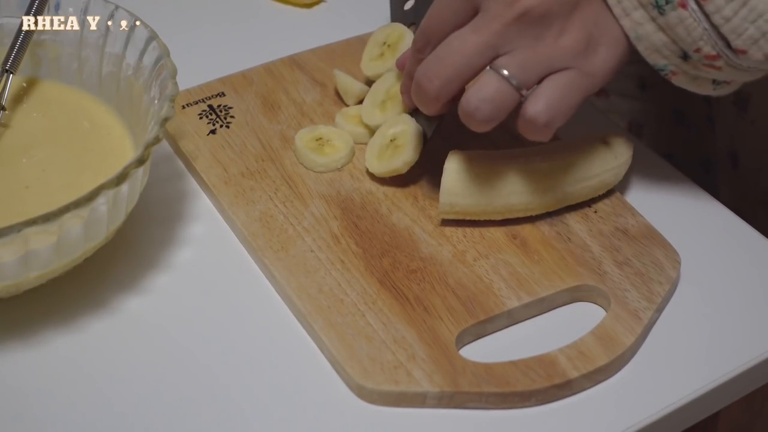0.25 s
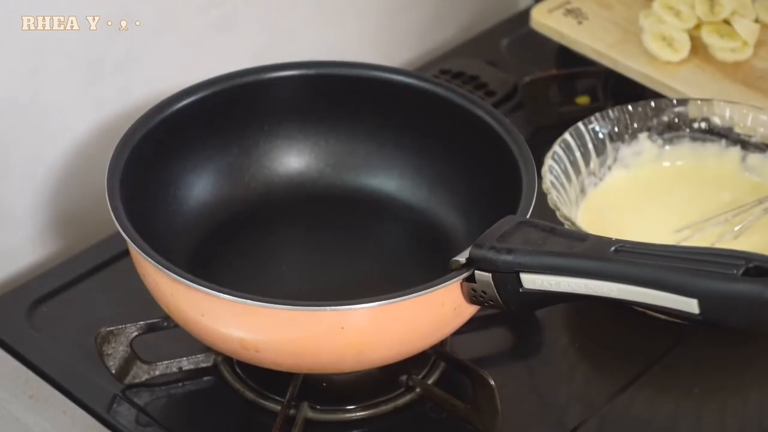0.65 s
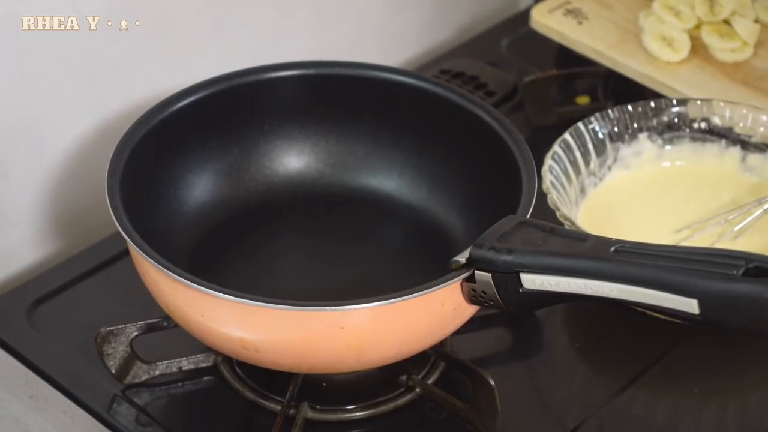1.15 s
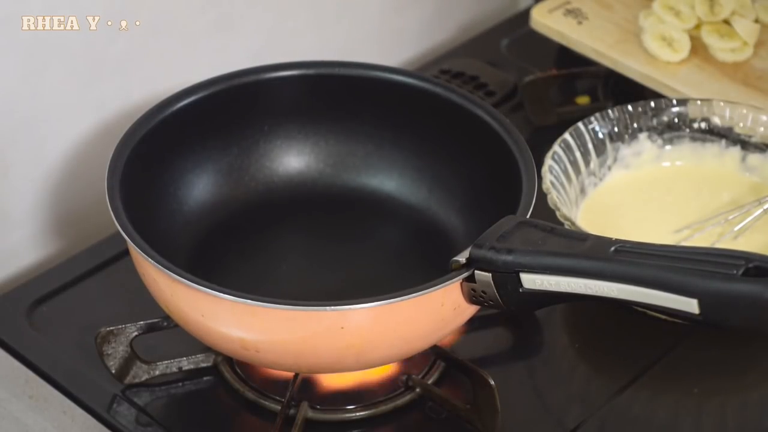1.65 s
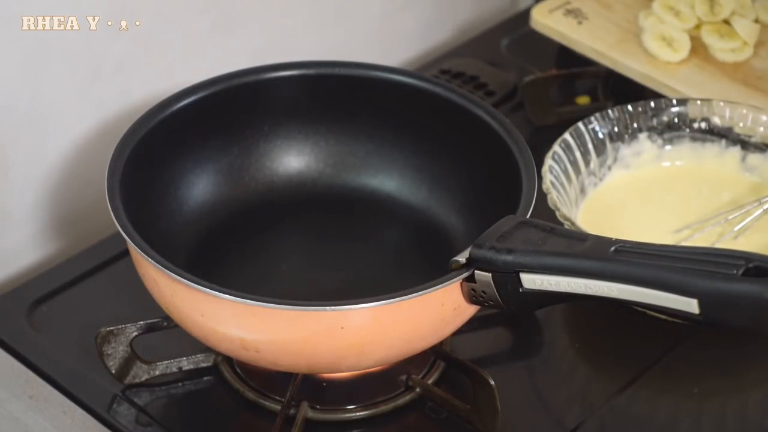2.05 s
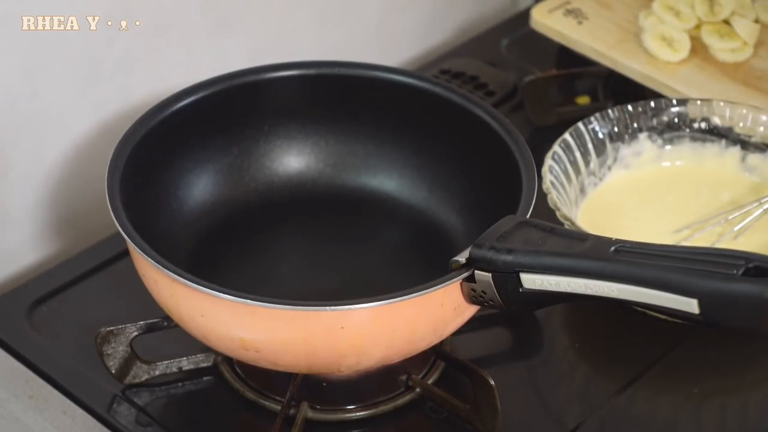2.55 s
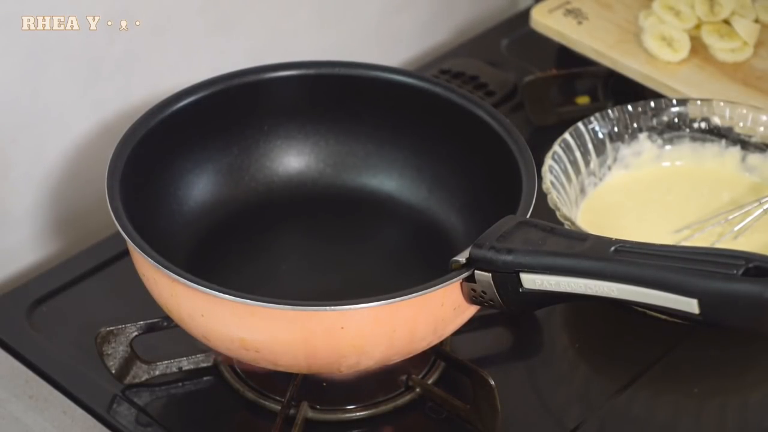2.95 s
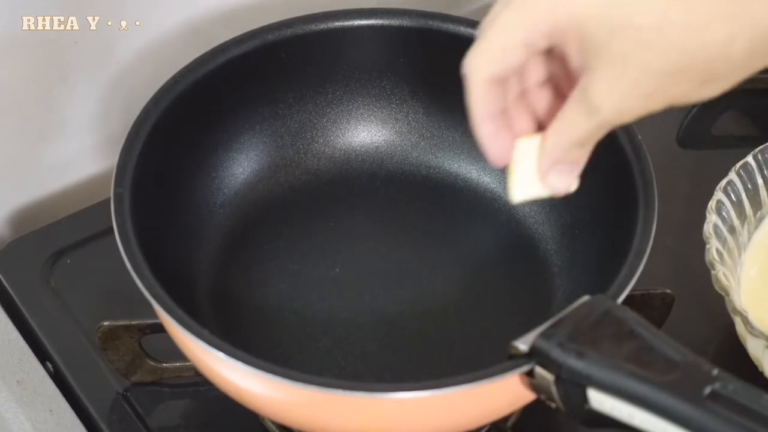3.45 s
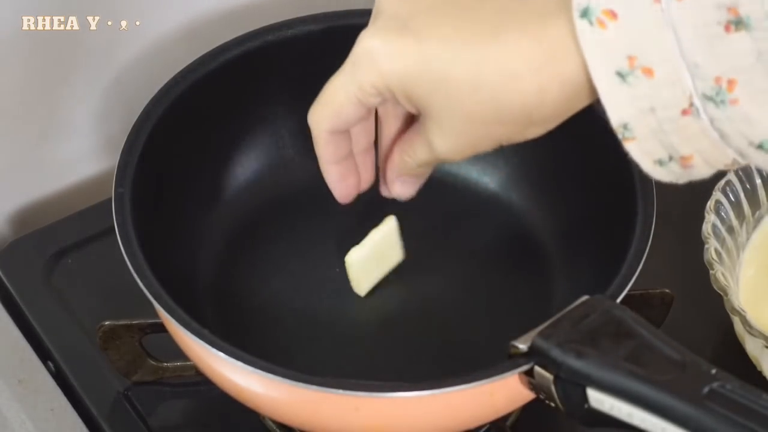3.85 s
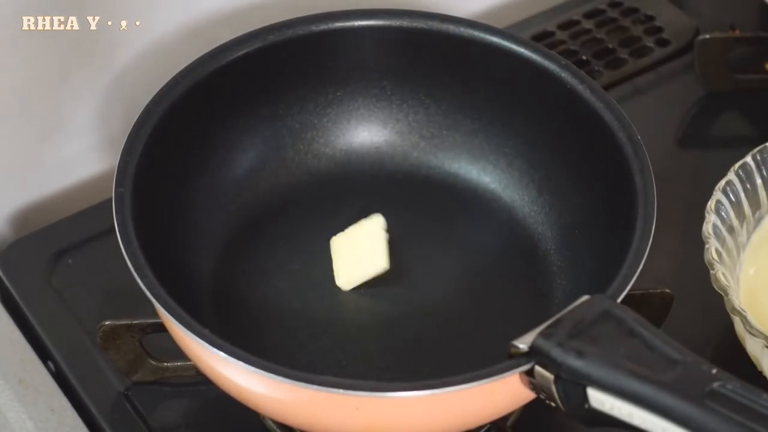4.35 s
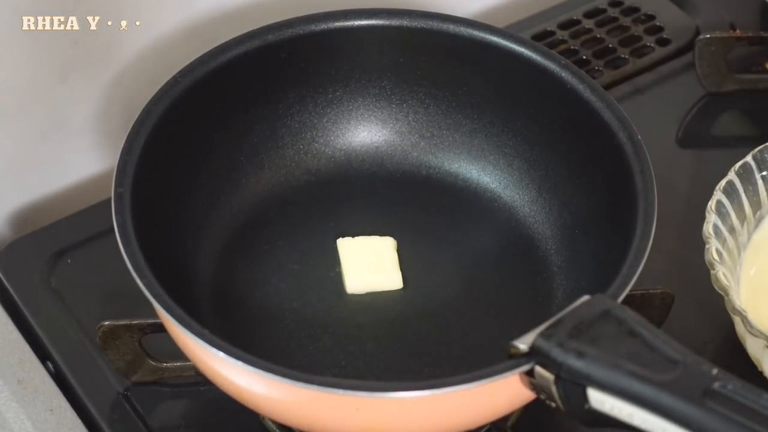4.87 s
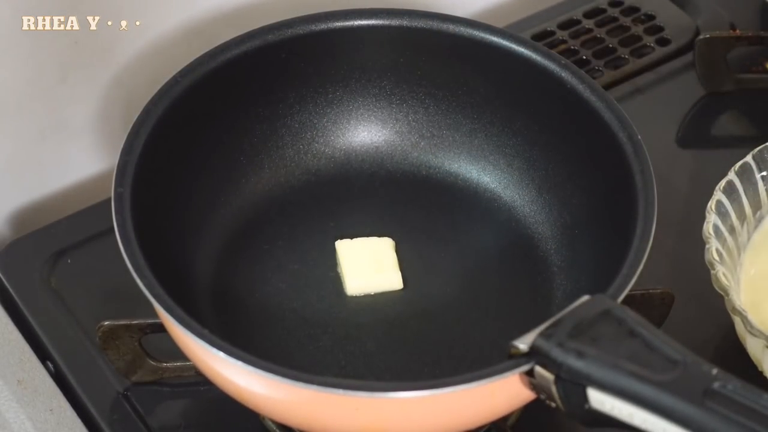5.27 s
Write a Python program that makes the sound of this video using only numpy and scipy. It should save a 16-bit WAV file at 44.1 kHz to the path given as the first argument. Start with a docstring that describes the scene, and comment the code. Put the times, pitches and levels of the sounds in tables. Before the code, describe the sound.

Knob clunks and quick igniter snaps light a gas burner with a soft puff, before butter taps and slaps into a frying pan.

```python
"""Lighting a gas hob and melting butter

In a small kitchen a knob knocks the hob casing into vibration and latches; the igniter's arc snaps
seven times a second, and the gas catches in puffs of combustion noise. A pat of cold butter is stood
in the pan and topples flat, exciting the pan's modes, then sizzles faintly as tiny bubbles burst.
Now and then there is a dry tick, a sleeve rustles and the microphone sways on its mount."""
import sys
import numpy as np
from scipy import signal
from scipy.fft import rfft, irfft
from scipy.io import wavfile

SR = 44100
rng = np.random.default_rng(int(sys.argv[2]) if len(sys.argv) > 2 else 0)


def store_pcm(level_fs):
    """Save levels as 16-bit WAV."""
    pcm = np.round(np.clip(level_fs, -1, 1) * 32767).astype(np.int16)
    wavfile.write(sys.argv[1], SR, np.atleast_2d(pcm).T)


N = 242991
TIME = np.arange(N) / SR
AGE = TIME[:SR]   # time axis of one transient

# Levels in the tables are relative. Reverberation time of the kitchen: f/Hz, t60/s
ROOM_T60 = [(150, 0.43), (700, 0.5), (2000, 0.33), (5500, 0.32), (9000, 0.27), (15000, 0.2)]
# room tone: f/Hz, level/dB
ROOM_TONE_SPECTRUM = [(24, -37), (40, -1.5), (147, -10), (237, -9.5), (262, -9), (363, -9), (433, -14),
                      (1340, -22.5), (1630, -17), (2260, -37), (2630, -24.5), (2840, -29.5), (16000, -39)]
# faint narrow hums: f/Hz, bandwidth/Hz, level/dB
HUMS = [(220, 27, -70.5), (1880, 250, -76.5), (2540, 120, -81.5), (4560, 90, -85)]
# dry ticks: t/s, level/dB, centre f/Hz
TICKS = [(.061, -55.5, 10000), (1.068, -49, 8700), (3.604, -52, 6730), (3.677, -52, 6400),
         (3.902, -51, 4940), (4.2833, -36.5, 6500), (4.693, -46.5, 9700), (4.784, -52, 7000),
         (4.991, -51.5, 5470), (5.149, -49.5, 5490), (5.4914, -49, 8930)]
# strokes of a sleeve: t/s, level/dB, rise/s, hold/s
SLEEVE_STROKES = [(.327, -55.5, 0.0056, .3), (.375, -50.5, 0.05, .02), (.51, -53, 0.04, .17),
                  (.69, -53.5, 0.035, .02), (3.16, -49, 0.0026, 0.024), (3.166, -42, .04, .29)]
# rubbing cloth: f/Hz, level/dB
SLEEVE_SPECTRUM = [(150, -16), (250, -15), (460, -8), (640, -2), (735, -6), (1760, 0.5), (2130, -2),
                   (3580, -5.5), (5730, -11), (12300, -22), (16000, -30)]
# nudges of the microphone mount: t/s, level/dB, f/Hz, rise/s, t60/s
SWAYS = [(0.331, -34.5, 9.3, .006, 3.2), (3.162, -27, 12.4, 0.0028, 2.7), (4.5, -38.5, 10.6, 0.058, 7.5)]
# rumble of the mount: f/Hz, level/dB
RUMBLE_SPECTRUM = [(20, -2), (42, -2), (75, -9), (130, -17), (400, -34.5), (2000, -67)]
# thumps through the hob: t/s, level/dB, swell/s
THUMPS = [(0.334, -49, .04), (3.165, -43, 0.03), (3.458, -45, 0.029), (3.6, -48.5, .04),
          (3.731, -46.5, .03), (4.036, -40.5, .045)]
# knocks of the knob on the casing: t/s, level/dB, swell/s, rattle/dB
KNOCKS = [(0.555, -32.5, 0.011, -15.5), (.664, -28, 0.01022, -11.5), (.85, -27, .006, -7.5),
          (1.024, -44.5, 0.012, -0.5), (1.377, -28.5, 0.0048, -14.5), (1.647, -30.5, 0.0082, -15),
          (2.02, -43.5, 0.00824, -8.5), (2.187, -47.5, 0.0085, -16), (2.337, -50.5, 0.0086, -25)]
# normal modes of the casing: f/Hz, level/dB, t60/s
CASING_MODES = [(213, -13, 0.14), (311, -7.5, 0.16), (359, -3, 0.031), (415, -15, 0.088), (525, -16, 0.093),
                (620, -7.5, 0.026), (700, -23, 0.017), (930, -17.5, 0.051)]
# loose parts of the casing: f/Hz, level/dB
RATTLE_SPECTRUM = [(200, 6), (600, 1), (1400, 5.5), (3200, -3), (6000, -14.5), (15000, -37)]
# impacts of the catch: t/s, level/dB, swell/s
LATCH_CLICKS = [(0.8329, -20, .001), (.837, -20, 0.0022), (0.923, -42.5, 0.0051)]
# click of the catch: f/Hz, level/dB
LATCH_SPECTRUM = [(300, -10.5), (1000, -3.5), (1800, -11.5), (2400, -3), (2900, -6), (3500, 0.5), (4400, 5),
                  (5200, 4.5), (6300, -6), (7800, -4.5), (10000, -15.5), (13000, -6), (16000, -22)]
# strength of the sparks, which weaken once the gas burns: t/s, level/dB
SPARK_LEVELS = [(1.12, -4), (1.37, -.2), (1.6, -5), (2.83, -9.5)]
# sound paths between hob and pan bottom: delay/s, level/dB
SPARK_PATHS = [(.0002, -14.5), (.0008, -14), (.00142, 0), (.00197, -5.5), (.0027, -24)]
# snap of a spark: f/Hz, level/dB
SPARK_SPECTRUM = [(300, -30), (900, -21.5), (1600, -4.5), (3000, -4), (4800, -18), (5700, -6.5), (7700, 1),
                  (9200, -5.5), (10900, -11.5), (11900, 3.5), (13200, 3), (15000, -5), (16000, -20)]
# resonances of burner and pan bottom: f/Hz, bandwidth/Hz, level/dB
SPARK_RESONANCES = [(1670, 260, -21), (2453, 150, -12.5), (4040, 280, -9), (5350, 39, -10),
                    (5830, 120, -8.5), (6760, 97, -9), (7740, 230, -9.5), (8220, 32, -10.5),
                    (9170, 55, -16), (10050, 30, -23), (11460, 49, -11), (12660, 330, -18.5)]
# a spark as the room returns it: f/Hz, level/dB
SPARK_ECHO_SPECTRUM = [(300, -29), (800, -10.5), (1400, -5.5), (2400, -3), (3300, -4), (4800, -2),
                       (5600, 0.5), (8000, 0.5), (10000, -3.5), (12500, -0.5), (15500, -9), (16000, -47)]
# puffs of gas catching round the burner ring: t/s, rise/s, hold/s, boom/dB, rush/dB
PUFFS = [(1.395, 0.049, .025, -37.5, -46.5), (1.485, 0.023, 0.13, -36.5, -62),
         (1.583, 0.069, .004, -43, -37)]
# boom of the catching gas: f/Hz, level/dB
BOOM_SPECTRUM = [(30, -13.5), (70, -2.5), (130, 1), (250, -4), (450, -15), (900, -19), (1600, -29),
                 (4000, -42), (12000, -45.5)]
# rush of the flame round the ring: f/Hz, level/dB
RUSH_SPECTRUM = [(150, -11.5), (400, -6.5), (700, 5.5), (1200, 1.5), (2000, -7.5), (4000, -19),
                 (12000, -48)]
# steady burner: f/Hz, level/dB
BURNER_SPECTRUM = [(24, -38.5), (40, 8), (69, -19), (109, 1), (180, -8), (283, -3), (320, -14.5),
                   (542, -16), (615, -13), (663, -17.5), (990, -20.5), (5180, -27), (7000, -35),
                   (8130, -31), (16000, -47)]
# contacts of butter and pan: t/s, level/dB, swell/s, hardness/dB
BUTTER_CONTACTS = [(3.8306, -7.5, 0.0079, -21.5), (4.0283, -60, 0.00065, 24), (4.394, -14, 0.00274, 4.5)]
# normal modes of the pan: f/Hz, level/dB, t60/s
PAN_MODES = [(186, -26.5, 0.099), (659, -7.5, 0.07), (685, -38.5, 1.8), (766.5, 2.5, 0.056),
             (800, -37.5, 0.2), (953, -6.5, 0.03), (1090, -10, 0.026), (1346, 1.5, .028), (1370, -36, 0.14),
             (1440, -33, 0.038), (2005, -10.5, 0.018), (2090, -14.5, 0.062), (2510, -13.5, 0.02),
             (3180, -7.5, 0.0063), (3870, -14, 0.017), (5180, -22.5, 0.01), (8000, -21, 0.02)]
# wet smack of the butter: f/Hz, level/dB
SLAP_SPECTRUM = [(150, -27), (450, -22), (1000, 2), (1800, 10.5), (3300, -2), (6300, -3.5), (9000, -13.5),
                 (11000, -25.5), (16000, -31)]
# shifts of the pan's weight on the grate: t/s, level/dB, swell/s
GRATE_SHIFTS = [(3.833, -32.5, 0.0029), (4.029, -44.5, 0.0014), (4.398, -39.5, 0.0043)]
# scuff on the grate: f/Hz, level/dB
GRATE_SPECTRUM = [(50, -19.5), (130, -21.5), (190, 4.5), (370, 0), (480, -4), (950, 0), (1300, -6),
                  (2000, -14.5), (5000, -34.5), (14000, -52.5)]
# bursting bubbles: f/Hz, level/dB
SIZZLE_SPECTRUM = [(1000, -10), (3000, 3), (5000, -7), (8300, 6.5), (10000, -5.5), (14000, 2.5),
                   (16000, -10.5)]


def from_db(db):
    """Amplitude ratio of a level in decibels."""
    return 10 ** (np.asarray(db) / 20)


def add(track, t, sound):
    """Superposition: a sound joins the track at time t."""
    start = max(round(t * SR), 0)
    track[start:start + len(sound)] += sound[:N - start]


def at_hz(points, hz):
    """Interpolation of a table along log frequency."""
    frequencies, values = np.transpose(points)
    return np.interp(np.log(hz), np.log(frequencies), values)


def colour(x, spectrum, size=8192):
    """Minimum-phase filtering at unit energy; folding the cepstrum makes the response causal."""
    hz = np.maximum(np.arange(size // 2 + 1) * SR / size, 1)
    cepstrum = irfft(np.log(from_db(at_hz(spectrum, hz))))
    cepstrum[1:size // 2] *= 2
    response = irfft(np.exp(rfft(cepstrum[:size // 2], size)))
    return signal.fftconvolve(x, response / np.linalg.norm(response))[:len(x)]


def noise(spectrum):
    """Stationary coloured noise of unit power."""
    return colour(rng.standard_normal(N), spectrum)


def resonate(x, hz, width_hz):
    """Forced response of a two-pole resonator of unit energy."""
    radius = np.exp(-np.pi * width_hz / SR)
    numerator = np.sqrt((1 - radius ** 2) / 2) * np.array([1, 0, -1])
    denominator = [1, -2 * radius * np.cos(2 * np.pi * hz / SR), radius ** 2]
    return signal.lfilter(numerator, denominator, x + 1e-18)


def fade_in(t, rise):
    """Linear onset from 0 to 1, starting at time t."""
    return np.clip((TIME - t) / max(rise, 1 / SR), 0, 1)


def gesture(t, rise, hold, sag_db_per_s, release_db_per_s):
    """Two-stage decay: after its rise the envelope sags, then falls faster once the hold ends."""
    held = np.maximum(TIME - t - rise, 0)
    released = np.maximum(held - hold, 0)
    return fade_in(t, rise) * from_db(-sag_db_per_s * held - release_db_per_s * released)


def blow(swell, t60):
    """Impact envelope: linear growth during contact, then exponential decay."""
    return np.minimum(AGE / max(swell, 1 / SR), 1) * from_db(-60 * np.maximum(AGE - swell, 0) / t60)


def ring(modes, swell):
    """Damped normal modes of a struck body, in phase when the contact ends."""
    return sum(from_db(db) * blow(swell, t60) * np.sin(2 * np.pi * hz * (AGE - swell))
               for hz, db, t60 in modes)


def burst(swell, t60):
    """Many tiny contacts add incoherently to a burst of noise."""
    return blow(swell, t60) * rng.standard_normal(SR)


def kitchen(x, wet_db, near_db, near_t60=0.15, onset_s=0.00067):
    """Reverberation: early reflections from hob and wall, and a tail that decays band by band."""
    edges_hz, tail = np.geomspace(60, 18000, 13), 0
    for low, high in zip(edges_hz, edges_hz[1:]):
        bandpass = signal.butter(2, [low, high], "band", fs=SR, output="sos")
        early = from_db(near_db) * blow(onset_s, near_t60)
        late = blow(onset_s, at_hz(ROOM_T60, np.sqrt(low * high)))
        tail += signal.sosfilt(bandpass, rng.standard_normal(SR)) * (early + late)
    return from_db(wet_db) * signal.fftconvolve(x, tail / np.linalg.norm(tail))[:N]


def room_tone(floor_db=-64):
    """Ambient noise: a broadband floor with faint narrowband hums."""
    hums = sum(from_db(db) * resonate(rng.standard_normal(N), hz, width) for hz, width, db in HUMS)
    return from_db(floor_db) * noise(ROOM_TONE_SPECTRUM) + hums


def ticks(width_hz=5000, t60=0.05, gain_db=-4.5):
    """Heavily damped transients, mostly from the warming pan and the butter, sound as dry ticks."""
    out = np.zeros(N)
    for t, db, hz in TICKS:
        add(out, t, from_db(db + gain_db) * resonate(burst(0, t60), hz, width_hz))
    return out + kitchen(out, wet_db=-12.5, near_db=-20.0)


def sleeve():
    """Friction noise of cloth; overlapping strokes add in power."""
    strokes = [from_db(db) * gesture(t, rise, hold, sag_db_per_s=29.5, release_db_per_s=144)
               for t, db, rise, hold in SLEEVE_STROKES]
    return np.linalg.norm(strokes, axis=0) * noise(SLEEVE_SPECTRUM)


def microphone_sway(rumble_db=-22.5):
    """Damped free oscillation: the nudged mount sways at an infrasonic rate and rumbles faintly."""
    out = np.zeros(N)
    rumble = from_db(rumble_db) * noise(RUMBLE_SPECTRUM)
    for t, db, hz, rise, t60 in SWAYS:
        age = np.maximum(TIME - t, 0)
        envelope = fade_in(t, rise) * from_db(db - 60 * age / t60)
        out += envelope * (rumble - np.cos(2 * np.pi * hz * age))
    return out


def thumps(hz=103.7, t60=0.25):
    """Structure-borne sound: one low mode carries dull thumps through the hob."""
    out = np.zeros(N)
    for t, db, swell in THUMPS:
        add(out, t, ring([(hz, db, t60)], swell))
    return out


def knob(rattle_t60=0.13):
    """Impact excitation: the knob sets the sheet-metal casing booming and its loose parts rattling."""
    out = np.zeros(N)
    for t, db, swell, rattle_db in KNOCKS:
        rattle = from_db(rattle_db) * colour(burst(swell, rattle_t60), RATTLE_SPECTRUM)
        add(out, t, from_db(db) * (ring(CASING_MODES, swell) + rattle))
    return out + kitchen(out, wet_db=-2.0, near_db=-15.0, near_t60=0.033)


def shaft_squeak(start_s=0.736, hz=2630, db=-42.5, t60=0.04):
    """A single damped mode sounds as the knob's shaft turns."""
    out = np.zeros(N)
    add(out, start_s, ring([(hz, db, t60)], swell=0.01))
    return out


def latch(t60=0.054, gain_db=-2.5, spring_hz=5200, spring_width_hz=160, spring_db=-16):
    """The catch snaps over, and its impacts drive the spring into brief resonance."""
    clicks = np.zeros(N)
    for t, db, swell in LATCH_CLICKS:
        add(clicks, t, from_db(db + gain_db) * burst(swell, t60))
    spring = from_db(spring_db) * resonate(clicks, spring_hz, spring_width_hz)
    out = colour(clicks, LATCH_SPECTRUM) + spring
    return out + kitchen(out, wet_db=-5.0, near_db=-7.0)


def igniter(first_s=1.1198, gap_s=0.14275, gap_shrink_s=0.00006, spark_count=13, spot_count=5,
            jitter_s=0.00002, snap_db=3.0, metal_db=0.5):
    """Multipath propagation: each spark is an impulse that arrives by several paths and rings metal."""
    snaps, spots = np.zeros(N), np.zeros((spot_count, N))
    for k in range(spark_count):
        t = first_s + gap_s * k - gap_shrink_s * k * k / 2
        db = np.interp(t, *np.transpose(SPARK_LEVELS))
        add(spots[k % spot_count], t, from_db([db]))
        for delay, path_db in SPARK_PATHS:
            add(snaps, t + delay + rng.normal(0, jitter_s), from_db([db + path_db + snap_db]))
    arcs = spots.sum(axis=0)
    metal = sum((-1) ** k * from_db(db + metal_db) * resonate(arcs, hz, width)
                for k, (hz, width, db) in enumerate(SPARK_RESONANCES))
    common_echo = kitchen(arcs, wet_db=3.5, near_db=9.5, near_t60=0.06)
    # the arc jumps between spots, so part of the echo changes
    spot_echoes = sum(kitchen(spot, wet_db=5.0, near_db=10.5, near_t60=0.024) for spot in spots)
    return colour(snaps, SPARK_SPECTRUM) + metal + colour(common_echo + spot_echoes, SPARK_ECHO_SPECTRUM)


def flame(lit_s=1.7, flutter_db=-56, calming_db_per_s=7, close_s=3.162, burner_db=-54):
    """Combustion noise: the gas catches in puffs, then the young flame flutters and calms."""
    close = fade_in(close_s, rise=0.0045)   # once close to the pan, the microphone hears the burner
    flutter = from_db(flutter_db - calming_db_per_s * (TIME - lit_s))
    boom = flutter * fade_in(lit_s, rise=0.056) * (1 - close)
    rush = np.zeros(N)
    for t, rise, hold, boom_db, rush_db in PUFFS:
        puff = gesture(t, rise, hold, sag_db_per_s=33.5, release_db_per_s=383)
        boom = np.hypot(boom, from_db(boom_db) * puff)
        rush = np.hypot(rush, from_db(rush_db) * puff)
    burner = close * from_db(burner_db) * noise(BURNER_SPECTRUM)
    return boom * noise(BOOM_SPECTRUM) + rush * noise(RUSH_SPECTRUM) + burner


def butter(soft_hz=1150, main_hz=780, slap_db=-17.0, slap_t60=0.088, slap_share=0.14, radiation_hz=330):
    """Contact time limits bandwidth: the pat's slow edge excites low modes, its flat slap all of them."""
    out = np.zeros(N)
    for t, db, swell, hardness_db in BUTTER_CONTACTS:
        pan = np.zeros(SR)
        for hz, mode_db, t60 in PAN_MODES:
            treble_db = hardness_db / (1 + (soft_hz / hz) ** 8)
            pan += ring([(hz, mode_db + treble_db, t60)], swell * main_hz / hz)   # high modes rise sooner
        slap = colour(burst(slap_share * swell, slap_t60), SLAP_SPECTRUM)
        add(out, t, from_db(db) * (pan + from_db(slap_db + hardness_db / 2) * slap))
    # a small pan radiates little bass
    out = signal.sosfilt(signal.butter(2, radiation_hz, "high", fs=SR, output="sos"), out)
    return out + kitchen(out, wet_db=-15.0, near_db=-14.0)


def grate(t60=0.32):
    """Contact noise: the pan settles on its iron supports with a dull scuff."""
    out = np.zeros(N)
    for t, db, swell in GRATE_SHIFTS:
        add(out, t, from_db(db) * burst(swell, t60))
    return colour(out, GRATE_SPECTRUM)


def sizzle(start_s=4.14, start_db=-70, growth_db_per_s=3.5, pops_per_s=1500):
    """Shot noise: tiny bubbles burst at random under the melting butter, growing steadily louder."""
    pops = (rng.random(N) < pops_per_s / SR) * rng.choice([-1, 1], N)
    pop_db = np.minimum(rng.exponential(1, N), 5)
    hiss = colour(pops * from_db(pop_db), SIZZLE_SPECTRUM)
    envelope = fade_in(start_s, rise=0.25) * from_db(start_db + growth_db_per_s * (TIME - start_s))
    return envelope * hiss / np.sqrt(np.mean(hiss ** 2))


def scene():
    """Superposition of all sources at one microphone."""
    background = room_tone() + ticks() + sleeve() + microphone_sway() + thumps()
    lighting = knob() + shaft_squeak() + latch() + igniter() + flame()
    frying = butter() + grate() + sizzle()
    return (background + lighting + frying)[None]


def record(dry):
    """Band limiting: a steep elliptic low-pass cuts the treble above 16.3 kHz."""
    return signal.sosfilt(signal.ellip(10, .1, 80, 16300, fs=SR, output="sos"), dry)


dry = scene()
out = record(dry)
store_pcm(out)
```